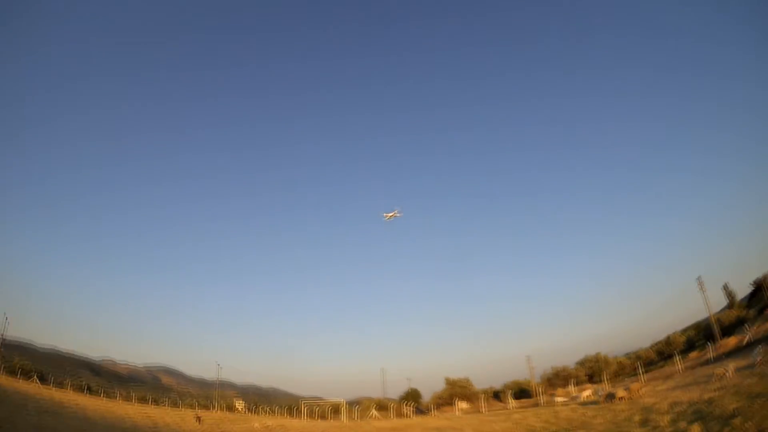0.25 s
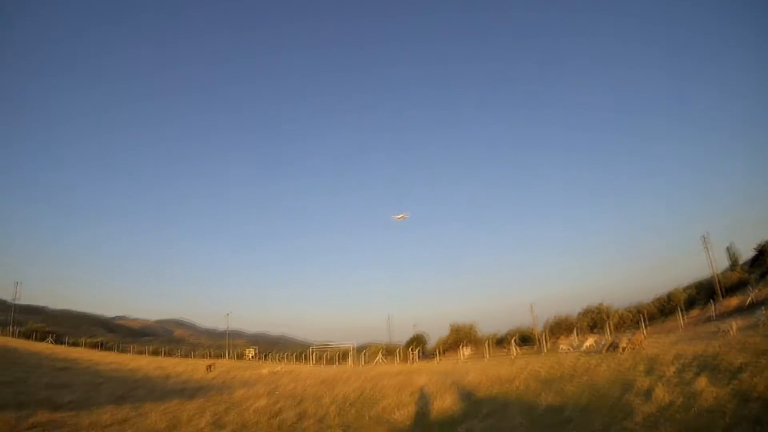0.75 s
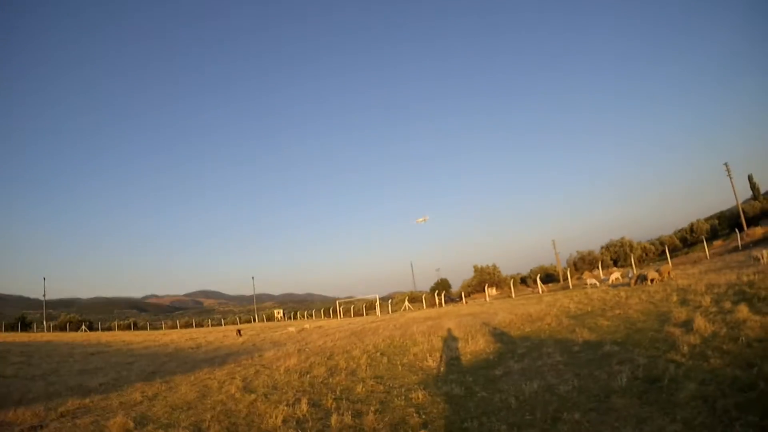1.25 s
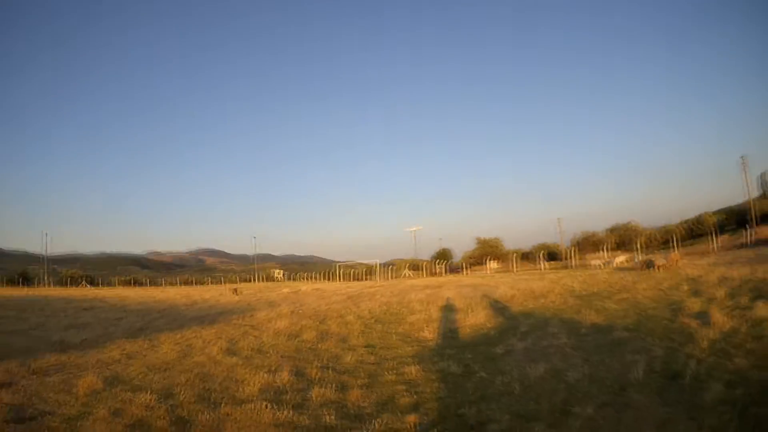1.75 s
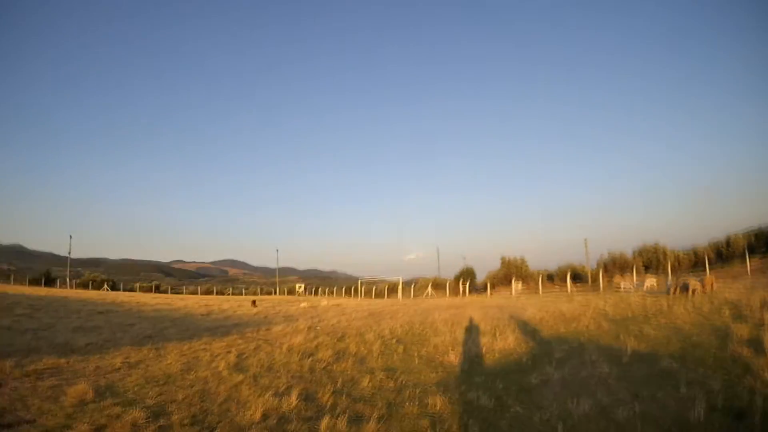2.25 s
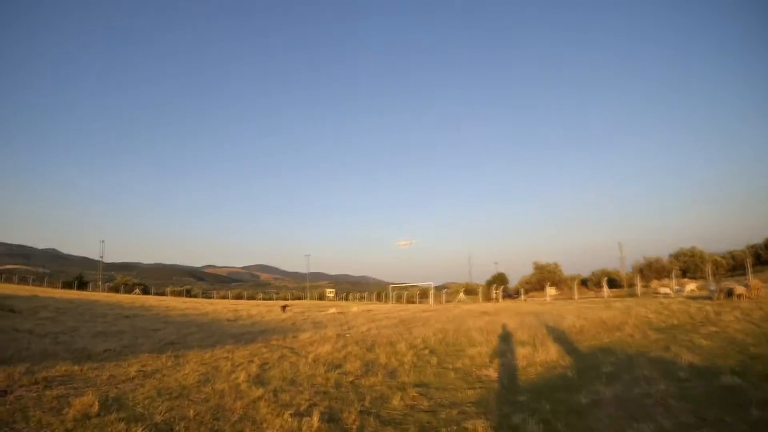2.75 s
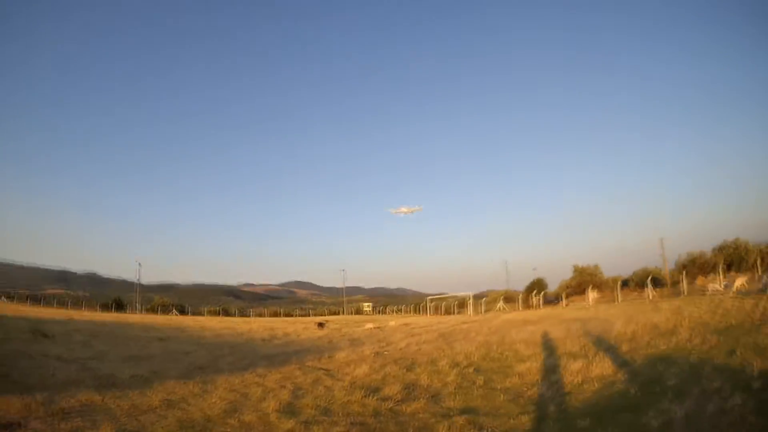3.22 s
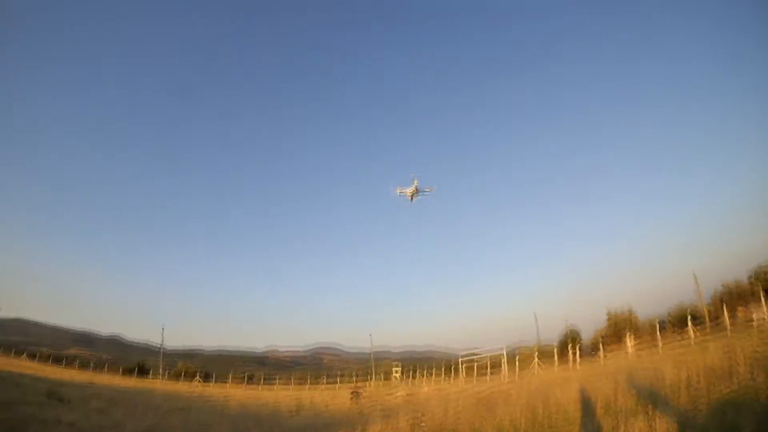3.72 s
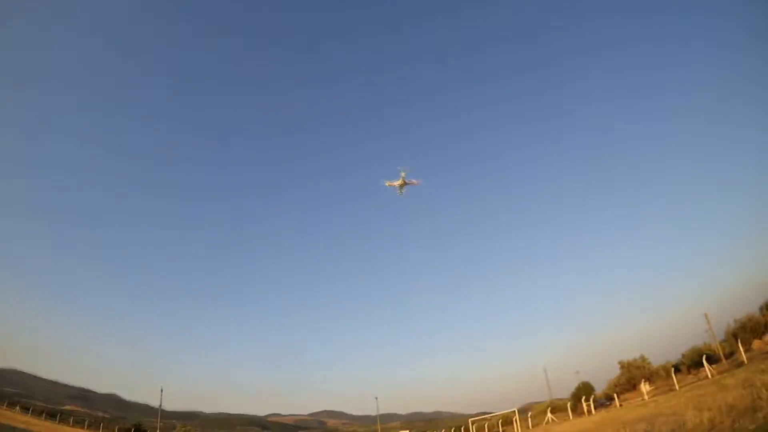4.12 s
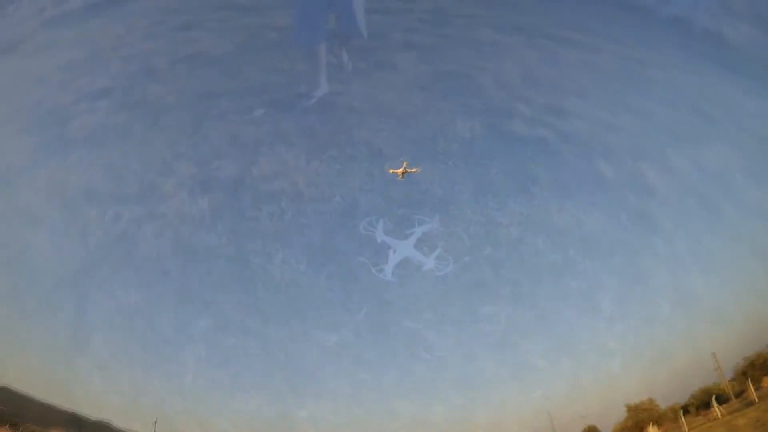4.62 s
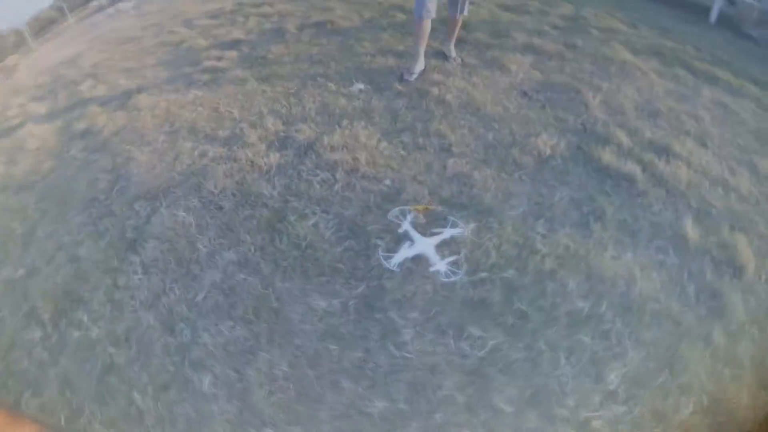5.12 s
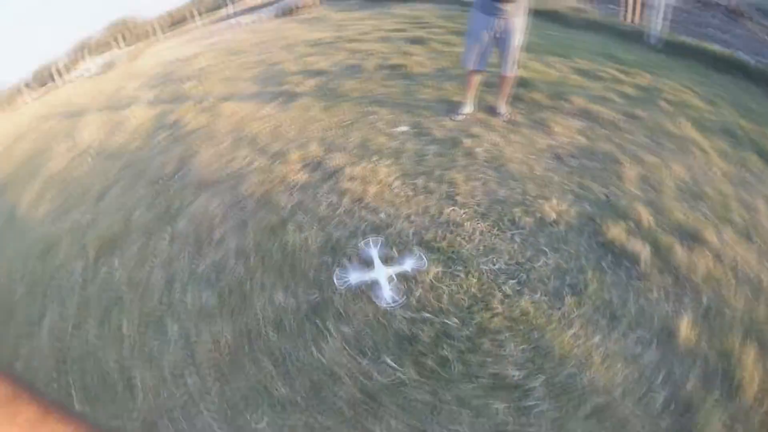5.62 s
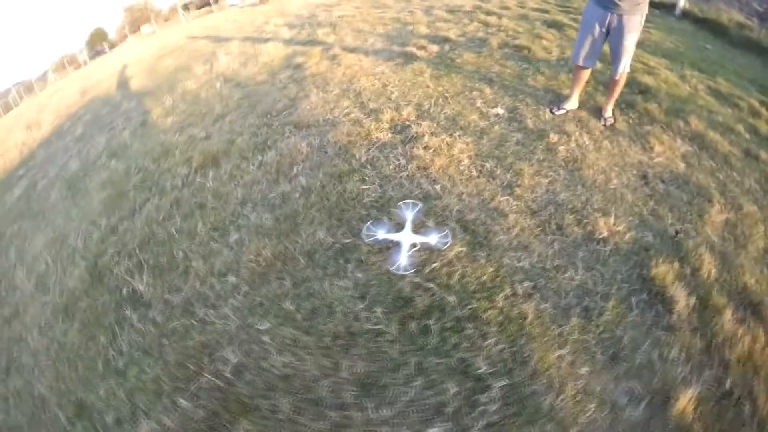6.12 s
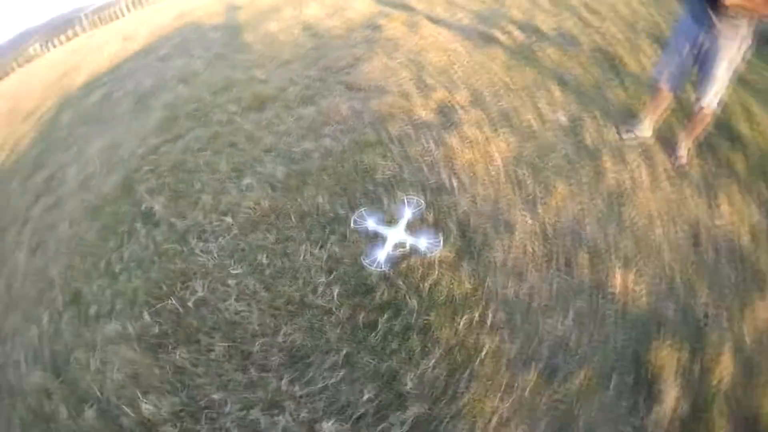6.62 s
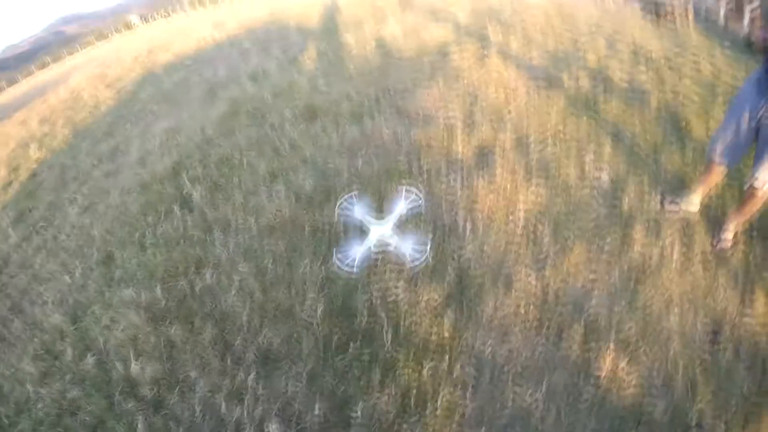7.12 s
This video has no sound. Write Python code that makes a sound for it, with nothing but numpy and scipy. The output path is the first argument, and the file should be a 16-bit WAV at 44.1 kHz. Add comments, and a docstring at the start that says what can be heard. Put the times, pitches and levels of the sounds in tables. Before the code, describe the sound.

Hand-held outdoor sound, dry and identical in both channels: piercing, narrow, fluttering motor whine from a distant toy drone, deep lumpy wind and tiny treble insect scratches. A sharp knock comes before the middle, then clusters of dull thumps, clicks and finger rubbing on the casing. After about two thirds, a nearby craft starts with a fast rising whine, then a stronger, grittier buzz with more handling bumps.

```python
"""A dry field on one hand-held microphone: from the start a toy quadcopter whines at a distance, its motors
singing through a resonance near 3-4.5 kHz on propeller hiss, while wind rumbles at the port and an insect rasps
in the grass as noise puffs. From 1.6 s knocks thump and click the camera case, from 3 s fingers rub it. At 5.3
s a second craft spins up close by; its whines carry weaker upper orders and a ladder of tones at a fixed step."""
import sys
import numpy as np
from scipy import signal
from scipy.fft import rfft, irfft, next_fast_len
from scipy.io import wavfile
from scipy.ndimage import uniform_filter1d, map_coordinates

SR = 44100
rng = np.random.default_rng(int(sys.argv[2]) if len(sys.argv) > 2 else 0)


def inscribe(sig):
    """Save sig as 16-bit PCM at rate SR to the path in sys.argv[1].

    A 1-D sig is mono; a 2-D sig holds one channel per row.
    Samples are clipped to [-1, 1] before scaling.
    """
    pcm = np.round(np.clip(np.atleast_2d(sig).T, -1, 1) * 32767)
    wavfile.write(sys.argv[1], SR, pcm.astype(np.int16))


N = 324576

# Colour of airframe and microphone: f/Hz, level/dB
PATH = [(100, -24.5), (600, -29.5), (1200, -28), (2300, -25), (2900, -19), (3250, -5.5), (3700, 0.5),
        (4400, -9.5), (4800, -26), (5500, -28), (6250, -27), (7000, -30), (11000, -36.5), (15500, -42)]
# Propeller hiss before each layer's trim: t/s, level in the resonance/dB, level around it/dB
PROPS = [(0.0, -50, -67), (0.53, -51.5, -67), (1.31, -52.5, -68), (1.62, -53.5, -67.5),
         (2.75, -51.5, -67.5), (3.67, -50, -65.5), (3.97, -46, -65), (4.3, -51, -67.5), (4.88, -56, -65),
         (5.31, -49, -64), (5.56, -47, -58.5), (5.68, -44, -61), (6.07, -42.5, -62), (6.39, -37.5, -60.5),
         (6.52, -38.5, -61), (6.93, -39, -59), (7.36, -41.5, -59)]
WHINE_ORDER = 6  # the shaft order heard as the whine
SOFT_HZ = 6000  # the case's treble falls away above this


def amp(db):
    """Decibels to amplitude."""
    return 10 ** (np.asarray(db) / 20)


def unit(x):
    """Scale to an rms of 1."""
    return x / np.sqrt(np.mean(x ** 2) + 1e-20)


def along(points, hz):
    """Read (f/Hz, value) points on a log frequency axis."""
    f, v = np.transpose(points)
    return np.interp(np.log(hz + 1), np.log(f + 1), v)


def curves(rows):
    """One value per sample for each column after the time."""
    s, *cols = np.transpose(rows)
    return [np.interp(np.arange(N) / SR, s, c) for c in cols]


def bumps(rows):
    """Smooth rises and falls from (centre t/s, length/s, height) rows."""
    t = np.arange(N) / SR
    return sum(top * np.cos(np.pi * np.clip((t - s) / length, -.5, .5)) ** 2 for s, length, top in rows)


def wobble(rate):
    """A smooth random curve, rate knots a second."""
    return map_coordinates(rng.standard_normal(int(N * rate / SR) + 4), [np.arange(N) * rate / SR])


def filtered(x, response):
    """Multiply the spectrum of x by a response of frequency."""
    m = next_fast_len(N + SR // 2)
    return irfft(rfft(x, m) * response(np.fft.rfftfreq(m, 1 / SR)), m)[..., :N]


def hiss(spectrum, patchy_db):
    """Coloured noise of rms 1 with time-frequency patches of random gain."""
    z = signal.stft(rng.standard_normal(N), nperseg=512)[2]
    field = rng.standard_normal(z.shape)
    field = uniform_filter1d(uniform_filter1d(field, 5, 0), 10, 1)
    noise = signal.istft(z * amp(patchy_db * unit(field)), nperseg=512)[1][:N]
    return unit(filtered(noise, lambda hz: amp(along(spectrum, hz))))


def motor(speed, drive_db, orders_db, close=False, blur=.04):
    """Shaft orders of one motor; each is coloured by the path at its own pitch and flutters on its own."""
    gear_ratio = 8.8  # motor turns per propeller turn
    upper_gain_db = -15  # on a close craft's orders above the whine
    companion_hz, companion_db, rung_db = 1150, -26, -2  # ladder step, level, change per rung
    s, whine_hz = np.transpose(speed)
    first = max(round((s[0] - .03) * SR), 0)
    last = min(round((s[-1] + .017) * SR), N)
    t = np.arange(first, last) / SR

    def flutter(rate):
        """Random values joined by straight lines, rate knots a second."""
        knots = np.arange(t[0], t[-1] + .1, 1 / rate)
        return np.interp(t, knots, rng.standard_normal(len(knots)))

    hz = uniform_filter1d(np.interp(t, s, whine_hz), size=1100, mode="nearest")
    hz = hz * (1 + .003 * uniform_filter1d(flutter(14), size=1100))  # slow wander of pitch
    turns = 2 * np.pi * np.cumsum(hz * (1 + .0014 * flutter(49.75))) / WHINE_ORDER / SR  # shaft angle, rad
    jitter = (.09 if close else blur) * flutter(150)
    # the level throbs once per turn of the geared propeller
    throb_depth = .704 if close else .62
    throb = 1 + throb_depth * np.sin(turns / gear_ratio + rng.uniform(0, 2 * np.pi))

    tones = np.zeros(len(t))
    for order, db in orders_db:
        level_db = db + 2 * flutter(40.65) + along(PATH, order * hz / WHINE_ORDER)
        if close and order > WHINE_ORDER:
            level_db += upper_gain_db
        phase_jitter = order * jitter * np.minimum(order / 12, 1 + close)
        tones += amp(level_db) * np.sin(order * turns + phase_jitter)
    if close:
        # a ladder of tones at a fixed step beside the near whine
        for rung in [-1, *range(1, 10)]:
            level_db = companion_db + rung_db * rung + 3 * flutter(90) + along(PATH, hz)
            step = rung * (2 * np.pi * companion_hz * t + 5 * jitter)
            tones += amp(level_db) * np.sin(WHINE_ORDER * (turns + jitter / 2) + step)

    fade = signal.windows.tukey(len(t), min(.07 * SR / len(t), 1))
    out = np.zeros(N)
    out[first:last] = np.sqrt(2) * amp(drive_db[first:last]) * throb * tones * fade
    return out


def flying_motors():
    """Whines in flight, far then near: each follows the propeller hiss, fades slowly and swells."""
    # three far motors that can be followed by ear, one list each: t/s, whine f/Hz
    far = [
        [(0, 3220), (.2, 3150), (.35, 3340), (.5, 3270), (.6, 3450), (.8, 3900), (.89, 3610), (.98, 3850),
         (1.1, 3730), (1.33, 3740), (1.53, 4090), (2.36, 4050), (2.5, 4280), (2.8, 4110), (2.98, 4350),
         (3.06, 4200), (3.25, 4350), (3.36, 4250), (3.71, 3670), (3.88, 3450), (3.98, 3540), (4.09, 3700),
         (4.15, 3730), (4.22, 3870), (4.3, 3870), (4.4, 3780), (4.5, 3830), (4.62, 3980), (4.68, 4150),
         (4.73, 4220), (4.78, 4050), (4.9, 3900), (5, 3920), (5.06, 3700), (5.12, 3820), (5.18, 4050),
         (5.3, 4100)],
        [(1.74, 3150), (1.84, 3450), (1.97, 3390), (2.06, 3510), (2.2, 3490), (2.35, 3680), (2.5, 3460),
         (2.68, 3780), (2.82, 3510), (2.98, 3630), (3.12, 3620), (3.3, 4060), (3.47, 4010), (3.65, 4230),
         (3.72, 4170), (3.8, 4370), (3.98, 4430), (4.02, 4380), (4.15, 4000), (4.23, 4110), (4.36, 3870),
         (4.47, 4100), (4.55, 4130), (4.62, 4300), (4.66, 4250), (4.74, 4510), (4.88, 4470), (5, 4400),
         (5.07, 4410), (5.22, 4130)],
        [(0, 3950), (.16, 4020), (.43, 3880), (.55, 4050), (.7, 4350), (.9, 4300), (1, 3950), (1.28, 4070),
         (1.36, 4430), (1.5, 4730), (1.88, 4500), (2.01, 4640), (2.15, 4470), (2.28, 4460), (2.35, 4600),
         (2.48, 4330), (2.55, 4450), (2.7, 4280), (2.84, 4580), (2.95, 4420), (3.26, 4410), (3.52, 4520),
         (3.6, 4290), (3.78, 3930), (3.98, 3950), (4.02, 4230), (4.08, 4380), (4.11, 4280), (4.2, 4390),
         (4.27, 4330), (4.33, 4590), (4.55, 4440), (4.6, 4290), (4.71, 4030), (4.77, 4000), (4.81, 4170),
         (4.87, 4220), (4.93, 4090), (5.05, 4040), (5.1, 3600), (5.19, 3480), (5.3, 3580), (5.5, 3600)],
    ]
    # three motors of the near craft after its start, one list each: t/s, whine f/Hz
    near = [
        [(5.47, 3850), (5.55, 4060), (5.7, 4120), (5.76, 4310), (5.87, 4360), (6.02, 3930), (6.14, 3800),
         (6.2, 3520), (6.24, 3470), (6.32, 3490), (6.36, 3600), (6.39, 3490), (6.44, 3420), (6.5, 3500),
         (6.58, 3790), (6.64, 4100), (6.69, 4210), (6.8, 4140), (6.87, 4020), (6.96, 4450), (7.07, 4130),
         (7.12, 4050), (7.17, 4110), (7.36, 3857)],
        [(5.5, 3780), (5.6, 3950), (5.68, 3960), (5.74, 3620), (5.85, 4050), (6.55, 3780), (6.63, 3670),
         (6.73, 3790), (6.9, 3950), (7, 3660), (7.05, 3680), (7.15, 3980), (7.26, 3950), (7.36, 3945)],
        [(5.64, 2850), (5.73, 3120), (5.86, 2850), (5.95, 3260), (6.04, 3130), (6.12, 3130), (6.22, 3400)],
    ]
    # a whine stands out or sinks into the hiss, one list per motor, far then near: centre t/s, length/s, gain/dB
    swells = [
        [(.4, 0.28, 5), (.64, 0.23, 12), (.89, 0.19, 5), (1.12, 0.11, 5.5), (1.38, .29, 3.5), (1.95, 0.67, -9),
         (2.45, .2, 4), (3.15, 1, 10.5), (3.55, 0.27, -6), (4.15, 0.3, -1.5), (4.62, 0.73, 5), (4.85, 0.57, 10),
         (5.12, 0.29, 1)],
        [(2.1, 0.54, 1.5), (2.4, 0.22, 1), (2.9, .42, 5), (3.25, 0.19, 2), (3.6, 1, 8.5), (3.9, 0.66, 2),
         (4.08, .14, 1), (4.23, 0.31, 7.5), (4.55, 0.73, 8.5), (4.8, 0.97, 10), (5.13, 0.33, 5.5)],
        [(.3, 0.69, 2), (.62, .33, 5), (1.4, 0.4, 6.5), (2.15, 0.68, 2), (2.58, 0.99, 6), (3.55, 0.2, 11),
         (3.7, 0.13, 5), (4.06, 0.29, 10.5), (4.23, 0.34, 9.5), (4.4, .14, -6), (4.6, 0.61, 9.5),
         (4.9, 0.77, 12.5), (5.08, 0.053, -7), (5.25, 0.41, 1.5)],
        [(5.6, .3, 6), (5.81, .2, 14), (6.03, .24, -6), (6.28, .22, 13), (6.44, .16, 10), (6.63, .12, 12),
         (6.78, .16, 11), (6.95, .16, 13), (7.2, .45, 10)],
        [(6.2, 1, -35), (6.67, 0.15, 7), (7.08, 0.16, 8.5), (7.28, 0.42, 9)],
        [(5.77, 0.26, 7.5), (6, 0.68, 8.5)],
    ]
    # shaft orders in flight: order, level/dB
    flight_orders = [(2, -9), (4, -12), (6, -2), (8, -10), (10, -12), (12, -13), (14, -13), (16, -12),
                     (18, -12)]
    closeness = [False] * len(far) + [True] * len(near)
    mix = np.zeros(N)
    for speed, rows, close in zip(far + near, swells, closeness):
        drive_db = curves(PROPS)[0] - 5.5 + 1.6 * wobble(9) + bumps(rows)
        mix += motor(speed, drive_db, flight_orders, close)
    return mix


def weave(count=16):
    """Weaker motor tones that drift at random through the resonance, surfacing and sinking."""
    tones = np.zeros(N)
    for centre_hz in np.linspace(3100, 4500, count):
        hz = centre_hz + 150 * wobble(3.5) + 80 * wobble(11) + 4 * wobble(50)
        level_db = 4.1 * wobble(6) + along(PATH, hz)
        tones += amp(level_db) * np.sin(2 * np.pi * np.cumsum(hz) / SR)
    return amp(curves(PROPS)[0] - 5.5) * unit(tones)


def props():
    """Blade turbulence: noise inside the resonance, in the valleys around it, and in one high airframe mode."""
    # the airframe mode near 6.3 kHz rings up: centre t/s, length/s, gain/dB
    buzz_swells = [(1.25, 0.46, 10), (1.8, 0.31, 15), (5.51, 0.44, 15), (6.15, 0.58, 13)]
    buzz_colour = [(5700, -30), (6100, -8), (6250, 0), (6500, -10), (7200, -30)]  # f/Hz, level/dB
    core_db, wide_db = curves(PROPS)
    valleys = [(hz, min(db, -22)) for hz, db in PATH]
    core = amp(core_db - 8.5) * hiss(PATH, patchy_db=1)
    wide = amp(wide_db + 4.5) * hiss(valleys, patchy_db=2.5)
    buzz_db = core_db - 28 + bumps(buzz_swells) + 2 * wobble(60)
    buzz = amp(buzz_db) * hiss(buzz_colour, patchy_db=2.5)
    return amp(1.4 * wobble(110)) * (core + wide) + buzz


def wind():
    """Slow lumpy pressure on the microphone port, and a few brighter puffs across it."""
    # rumble, before its random lumps: t/s, level/dB
    wind_level = [(0.0, -42.5), (1.0, -32), (1.25, -40.5), (1.84, -32.5), (2.8, -35), (3.48, -30),
                  (4.4, -31.5), (5.4, -34), (5.7, -33.5), (6.85, -31.5), (7.11, -25.5), (7.36, -35.5)]
    # colour of the rumble: f/Hz, level/dB per Hz
    rumble = [(1, 0), (8, -2), (25, -4.5), (36, -19.5), (55, -35), (100, -33.5), (250, -63.5), (900, -110),
              (3000, -120)]
    # puffs across the port: t/s, level/dB
    gusts = [(1.619, -62), (2.279, -61)]
    t = np.arange(N) / SR
    lumps = unit(amp(2.2 * wobble(5)) * hiss(rumble, patchy_db=1.5))
    puffs = sum(amp(db) * np.exp(-((t - s) / .037) ** 2) for s, db in gusts)
    puff_noise = hiss([(60, -11), (300, -8), (800, -15), (1200, -59)], patchy_db=2)
    return amp(curves(wind_level)[0]) * lumps + puffs * puff_noise


def microphone_hiss():
    """Steady noise of the microphone itself, brighter towards the treble."""
    return amp(-75) * hiss([(4000, -15), (8000, -5)], patchy_db=3)


def insect():
    """Short scratchy puffs of treble noise in the grass, slowing a little within a phrase."""
    # phrases: first rasp t/s, last rasp t/s
    phrases = [(.06, .5), (.74, 1.34), (1.54, 1.99), (2.22, 2.66), (2.84, 3.14), (3.4, 3.82), (3.99, 4.47),
               (4.71, 5.19), (5.45, 5.9)]
    # colour of a rasp: f/Hz, level/dB per Hz
    rasp = [(5000, -40), (7300, -9), (8600, 0), (9800, -7), (11100, 5), (12000, -2), (15500, 0)]
    spacing_s, slowing = .15, 1.15  # mean gap aimed at; exponent that widens later gaps
    times = []
    for first, last in phrases:
        steps = np.linspace(0, 1, round((last - first) / spacing_s) + 1)
        times.append(first + (last - first) * steps ** slowing)
    times = np.concatenate(times)
    starts = np.zeros(N)
    starts[(times * SR).astype(int)] = amp(rng.normal(0, 3, len(times)))
    puffs = signal.fftconvolve(starts, np.hanning(round(.06 * SR)), "same")
    return amp(-68.5) * puffs * hiss(rasp, patchy_db=1)


def case_modes(f, scatter_db):
    """Response of the case's upper modes: damped resonances of alternating sign, with random level scatter."""
    # upper modes: f/Hz, width/Hz, level/dB
    upper_modes = [(267, 51, -7), (521.5, 60.7, 3.5), (773, 27, -2.5), (978, 100, -2.5), (1600, 163, -1),
                   (2350, 220, -5.5), (2775, 290, -6.5), (3880, 650, -15), (5380, 270, -19.5)]
    response = 0
    for k, (hz, width, db) in enumerate(upper_modes):
        resonance = 1j * f * width / (hz * hz - f * f + 1j * f * width)
        response = response + (-1) ** k * amp(db + rng.normal(0, scatter_db)) * resonance
    return response


def softening(f):
    """Two-pole loss of the case's treble."""
    return 1 / (1 + 1j * f / SOFT_HZ) ** 2


def grip_thump(t):
    """A knock shoves the air in the port and swings the camera on its grip as decaying low modes."""
    # the camera on its grip: f/Hz, level/dB, 60 dB decay time/s, first crest t/s
    mount = [(130, -4, .13, .0037), (92, -9, .07, .0045), (46, -3, .09, .0005)]
    shove = .3 * np.exp(-((t - .0037) / .004) ** 2)
    grip = np.exp(rng.normal(0, .18))  # a firmer or looser hand damps the swing
    swing = np.zeros(len(t))
    for hz, db, t60, crest in mount:
        decay = amp(db + rng.normal(0, 1.5) - 60 * t / t60 / grip)
        swing += decay * np.cos(2 * np.pi * hz * rng.normal(1, .05) * (t - crest))
    return (swing + shove) * (1 - np.exp(-(t / .0062) ** 2))


def case_click(t, click_db, thump_db):
    """The rattly contact of a knock: a noise burst that rings each upper mode anew."""
    bins_hz = np.fft.rfftfreq(len(t), 1 / SR)
    rattle = (amp(-60 * t / .0087) + .1 * amp(-60 * t / .06)) * rng.standard_normal(len(t))
    rattle *= 1 - np.exp(-t / .0013 * amp(click_db + 29.5))  # light contacts start more softly
    # more click over thump tilts the spectrum towards treble, .2 dB an octave per dB
    octaves = np.log2(np.clip(bins_hz, 300, 3000) / 1500)
    tilt = amp(.2 * (click_db - thump_db + 13.5) * octaves)
    response = case_modes(bins_hz * rng.normal(1, .019), scatter_db=2) * tilt * softening(bins_hz)
    ringing = irfft(rfft(rattle) * response, len(t))
    return amp(click_db + 37) * ringing / np.linalg.norm(rattle)


def knocks():
    """Each knock on the hand-held camera is a low thump of the grip plus a click of the case."""
    # knocks: t/s, relative click level/dB, relative thump level/dB
    knock_rows = [(1.608, -61, -34), (2.138, -61, -38.5), (2.762, -65, -34.5), (2.937, -35, -14.5),
                  (3.187, -43.5, -31), (3.388, -19, -16.5), (3.413, -52, -24), (3.827, -41, -20.5),
                  (4.286, -41.5, -10.5), (4.307, -48.5, -36), (4.33, -43, -14), (4.431, -45, -15),
                  (4.538, -46, -19.5), (4.645, -36.5, -13.5), (4.664, -48, -19.5), (4.686, -42, -29),
                  (4.854, -33, -20.5), (4.89, -34, -21.5), (4.933, -32.5, -15), (4.982, -25.5, -17),
                  (5.163, -45, -21.5), (5.246, -44, -18.5), (5.319, -46.5, -24), (5.333, -44.5, -20),
                  (5.57, -50.5, -21), (5.858, -40, -27), (6.015, -37.5, -24), (6.598, -49, -25),
                  (6.778, -30.5, -15), (6.808, -34.5, -12), (6.826, -35, -18.5), (6.876, -46, -31),
                  (6.894, -44, -26.5), (7.025, -44, -21), (7.038, -35, -14), (7.051, -27.5, -17),
                  (7.065, -28.5, -11.5), (7.105, -42, -29), (7.154, -46, -22.5)]
    # knocks that swing the camera the other way: t/s
    pulls = [3.388, 4.854, 4.89, 4.933, 4.982, 6.778, 6.808, 7.025, 7.05]
    out = np.zeros(N + SR)
    t = np.arange(SR // 5) / SR
    for s, click_db, thump_db in knock_rows:
        direction = -1 if min(abs(s - pull) for pull in pulls) < .004 else 1
        thump = direction * amp(thump_db) * grip_thump(t)
        out[round(s * SR):][:len(t)] += thump + case_click(t, click_db, thump_db)
    return out[:N]


def rubs():
    """Fingers rubbing on the case: gritty noise excites its upper modes."""
    # rubs: centre t/s, length/s, level/dB
    rub_rows = [(3.073, 0.3, -53), (5.381, 0.34, -51.5), (6.837, 0.25, -51.5), (7.085, 0.15, -45.5)]
    grit = np.diff(rng.standard_normal(N + 1)) * amp(2 * wobble(98))
    grit += .19 * rng.standard_normal(N)
    ringing = unit(filtered(grit, lambda f: case_modes(f, 0) * softening(f)))
    return bumps([(s, length, amp(db)) for s, length, db in rub_rows]) * ringing


def spin_up():
    """The near craft starts: one motor's whine climbs and a weaker, slower second trails it."""
    # start of the near craft: t/s, whine f/Hz, whine level before trims/dB
    climb = [(5.295, 1250, -94), (5.315, 1550, -69), (5.335, 2050, -72), (5.355, 2330, -75),
             (5.39, 2950, -55), (5.44, 3450, -42), (5.499, 3766, -48), (5.56, 3940, -53)]
    # shaft orders at the start: order, level/dB
    start_orders = [(4, -9), (5, -14), (6, -2.5), (7, -16), (9, -9), (10, -13), (12, -2)]
    whine_hz, heard_db = curves(climb)
    drive_db = heard_db + 3 - along(PATH, whine_hz)  # undo the path's colour at the whine
    mix = np.zeros(N)
    for speed_share, db in [(1, 0), (.94, -11)]:
        speed = [(s, speed_share * hz) for s, hz, _ in climb]
        mix += motor(speed, drive_db + db, start_orders, blur=.12)
    return mix


def scene():
    """All sources on the one microphone, the same in both channels."""
    craft = flying_motors() + weave() + props() + spin_up()
    field = wind() + microphone_hiss() + insect()
    handling = knocks() + rubs()
    mono = craft + field + handling
    return np.array([mono, mono])


def record(dry):
    """Cut everything from 15.4 kHz up and add a small constant offset."""
    return filtered(dry, lambda hz: hz < 15400) - .0025


dry = scene()
out = record(dry)
inscribe(out)
```